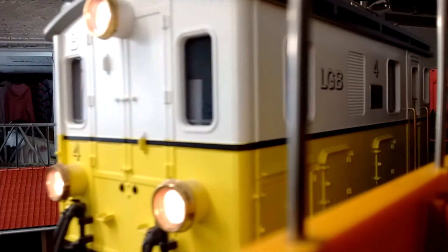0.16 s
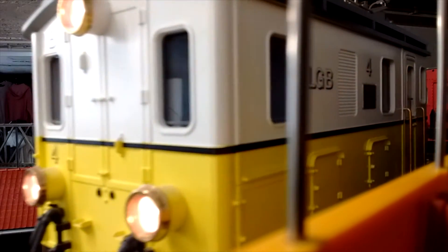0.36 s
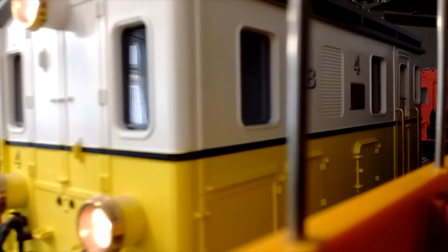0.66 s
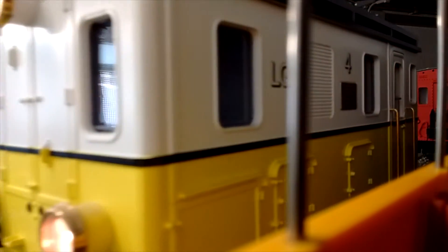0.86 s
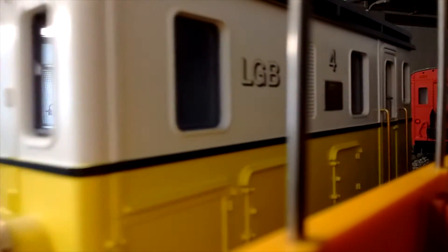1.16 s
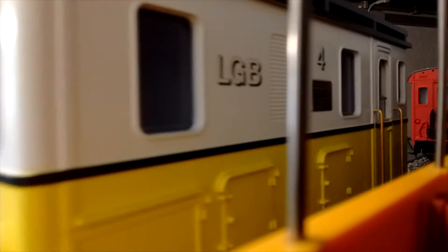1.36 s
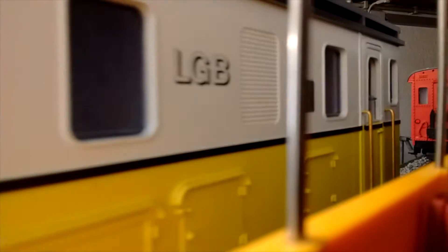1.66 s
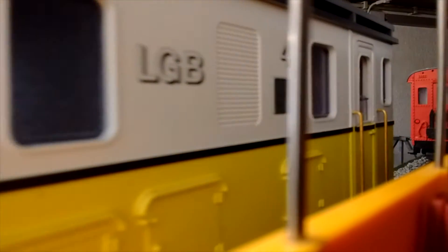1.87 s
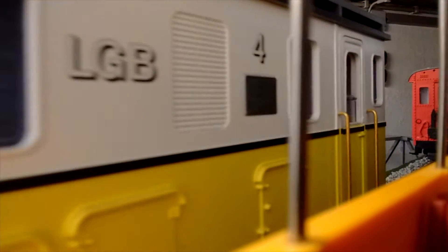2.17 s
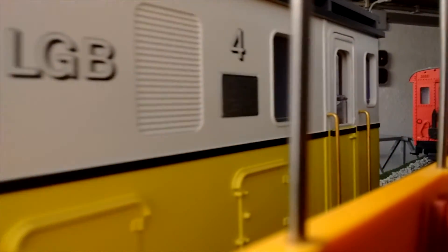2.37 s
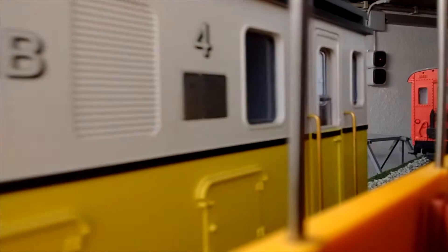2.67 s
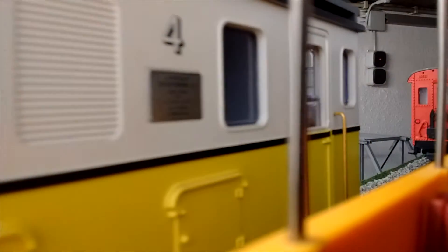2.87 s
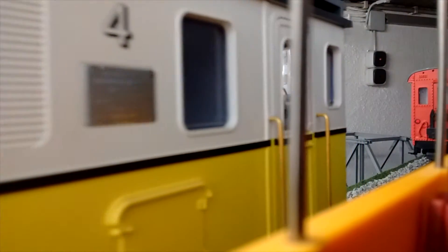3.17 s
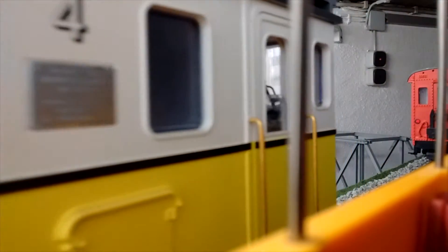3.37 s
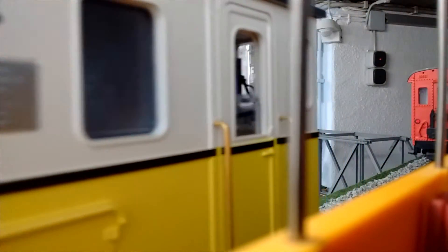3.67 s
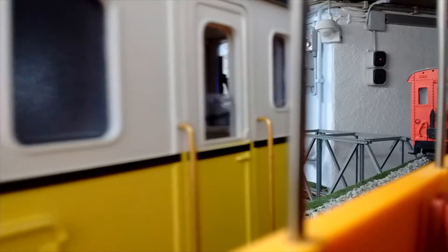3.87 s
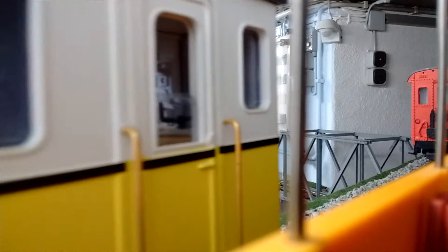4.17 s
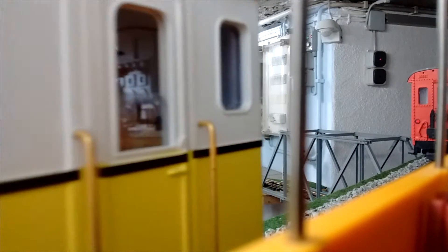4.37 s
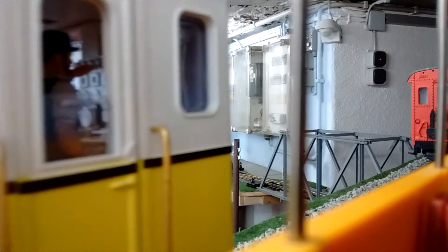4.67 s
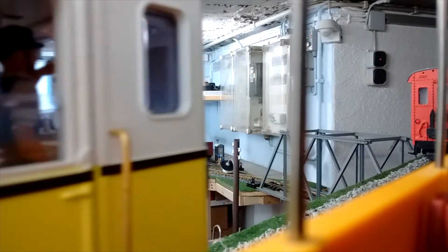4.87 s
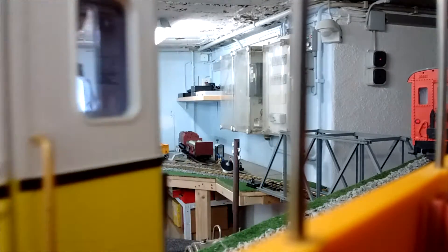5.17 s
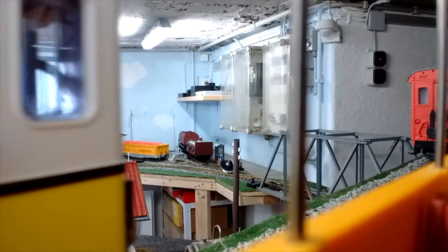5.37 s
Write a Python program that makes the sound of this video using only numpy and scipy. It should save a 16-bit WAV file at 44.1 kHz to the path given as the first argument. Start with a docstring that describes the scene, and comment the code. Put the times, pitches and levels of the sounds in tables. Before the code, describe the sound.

A small electric model locomotive creeps past two microphones right beside the track in a basement room, already running at the start and still running at the end, about 5.5 seconds. The motor gives a rough, steady buzz with a faint high whine; gears rasp and rattle, throbbing about ten times a second. The plastic shell drums hollowly over a low, wavering baseboard hum, while wheels hiss thinly on the rails. At 1.1 s a flange scuffs briefly; soft thuds and ticks come around 1.4 to 1.7 and 2.3 s. From about 2.7 s the higher buzz opens up, and around 3.3 s the engine is abreast, brightest and furthest left. More small ticks and bumps follow from 3.1 to 4.6 s. Just before 5 s a hard, close, clattering knock bursts out, with a short ring and room echo. The limiter then ducks the hissing, buzzing motor, which remains subdued to the end.

```python
"""Model locomotive creeping past

A model locomotive creeps past two microphones beside the track in a basement room.
Its pulse-fed motor buzzes as a stack of notes; shaped noise gives the gears' whirr, the drumming of the
plastic shell and the hiss and ticks of the wheels on the rails. The baseboard drones on a low note.
Near the end comes one hard, close knock, after which the limiter holds everything down."""
import sys
import numpy as np
from scipy import signal
from scipy.fft import rfft, irfft, next_fast_len
from scipy.io import wavfile
from scipy.ndimage import uniform_filter1d, map_coordinates

SR = 44100
rng = np.random.default_rng(int(sys.argv[2]) if len(sys.argv) > 2 else 0)


def transcribe(signal):
    """Save signal, clipped to [-1, 1], as a 16-bit WAV file at the path in sys.argv[1]."""
    frames = np.atleast_2d(signal).T
    limited = np.clip(frames, -1, 1)
    pcm = np.round(limited * 32767).astype(np.int16)
    wavfile.write(sys.argv[1], SR, pcm)


N = 243431
TIME = np.arange(N) / SR  # seconds
PULSE_HZ, PULSE_AT_S = 122.07, 0.0071  # rate of the motor's supply pulses, time of the first
GEAR_TURNS_PER_S = 10.38

# Resonances of the baseboard. Each row: pitch in Hz, width in Hz, relative level in dB.
BOARD_RESONANCES = [(50, 18, -5), (69, 14, -6), (89.5, 2.9, 6), (131.7, 65, 0.5), (166, 39, -5)]
# Colour of the gear noise. Each row: frequency in Hz, relative level in dB per Hz.
WHIRR_COLOUR = [(450, -27.5), (600, 3), (760, 2), (820, -2.5), (940, 7.5), (1080, -4.5), (1280, 0.5),
                (1550, -0.5), (1900, -11.5), (2180, 0), (2400, -18), (2800, -11.5), (3600, -76)]
# Left-right balance. Each row: frequency in Hz, left level minus right level in dB.
LEFT_RIGHT = [(60, -5.5), (200, 5), (380, 8.5), (560, 10), (950, -2), (1300, 0.5), (1800, 6), (2200, 2),
              (3000, 1.5), (6300, 4.5), (9500, 0), (13000, 4.5)]
# How far the left microphone leads. Each row: frequency in Hz, lead in radians.
LEFT_LEAD = [(400, 0), (2150, 0.5), (2450, 2.5), (3700, 4.5), (4300, 7.5), (5200, 4), (6400, 10),
             (8000, 11), (9300, 35.5), (11200, 21)]


def amp(db):
    """Turns decibels into gain."""
    return 10 ** (np.asarray(db) / 20)


def unit(x):
    """Scales a sound to rms 1; a pair is scaled by the mean of its channels."""
    return x / np.sqrt(np.mean(np.atleast_2d(x).mean(0) ** 2) + 1e-20)


def read(points, hz):
    """Reads a table's value at hz, on a log-frequency axis."""
    f, value = np.transpose(points)
    return np.interp(np.log(hz + 1), np.log(f), value)


def curves(rows):
    """Draws every column of a time table as a curve, sample by sample."""
    s, *columns = np.transpose(rows)
    return [np.interp(TIME, s, c) for c in columns]


def add(mix, s, sound):
    """Mixes a stereo sound in at time s."""
    part = mix[:, round(s * SR):][:, :sound.shape[1]]
    part += sound[:, :part.shape[1]]


def drift(hz):
    """Slow random wandering of rms 1, with little movement faster than about hz."""
    f = np.fft.rfftfreq(N, 1 / SR)
    lowpass = (f > 0) / (1 + (f / hz) ** 2) ** 2
    return unit(irfft(rfft(rng.standard_normal(N)) * lowpass, N))


def spectrum(points, hz):
    """Gain of a colour table, falling away below its first point."""
    return amp(read(points, hz)) * np.minimum(hz / points[0][0], 1) ** 2


def resonances(modes, hz):
    """Gain of a set of resonances with steep skirts, added as powers."""
    return np.sqrt(sum((amp(db) / (1 + ((hz - f) / width) ** 2)) ** 2 for f, width, db in modes))


def causal(gain):
    """The response with this gain that rings only after the blow (minimum phase)."""
    cepstrum = irfft(np.log(gain + 1e-6))
    half = cepstrum.shape[-1] // 2
    fold = np.r_[1, np.full(half - 1, 2), 1, np.zeros(half - 1)]
    return np.exp(rfft(cepstrum * fold))


def noise(colour, size=N, balance=LEFT_RIGHT):
    """Coloured noise as two microphones hear it: partly alike, with a lead and a balance in each band."""
    # Each row: frequency in Hz, left-right likeness, which is clipped to -1..1 below.
    likeness = [(60, 1.3), (160, -0.7), (340, 0.53), (640, 2.5), (1500, 3), (2300, .5), (3200, 0.96),
                (4600, 1.03), (5600, -1), (6400, 1.6), (9300, -0.45), (12000, 0)]
    length = next_fast_len(size)
    hz = np.fft.rfftfreq(length, 1 / SR)
    left, other = rfft(rng.standard_normal((2, length)))
    same = np.clip(read(likeness, hz), -1, 1)
    lean = amp(read(balance, hz) / 2)
    right = same * left * np.exp(-1j * read(LEFT_LEAD, hz)) + np.sqrt(1 - same ** 2) * other
    return unit(irfft(np.array([left * lean, right / lean]) * colour(hz), length)[:, :size])


def steady(x, size):
    """Evens out a noise's own swells over size samples, keeping its fast grain."""
    return unit(x / np.sqrt(uniform_filter1d((x ** 2).mean(0), size=size) + 1e-9))


def burst(colour, db, decay, balance=LEFT_RIGHT, size=8192, rise_share=0.21):
    """One contact: a brief chatter of even spectrum builds up, dies away and sets the body ringing."""
    t, hz = np.arange(size) / SR, np.fft.rfftfreq(size, 1 / SR)
    envelope = np.exp(-t / decay) * (1 - np.exp(-t / (rise_share * decay)))
    chatter = rfft(noise(np.ones_like, size=size) * envelope)
    uneven = np.sqrt(uniform_filter1d(abs(chatter) ** 2, size=40))
    lean = amp(np.outer([.5, -.5], read(balance, hz)))
    ring = irfft(chatter * causal(colour(hz) * lean / uneven))
    # A longer contact carries more energy at the same level in dB.
    return amp(db) * unit(ring) * np.sqrt(np.mean(np.exp(-2 * t / decay)))


def contacts(rows, body, balance=LEFT_RIGHT):
    """Blows on one body, each with its own level, decay and treble edge; a lower edge sounds duller."""
    out = np.zeros((2, N))
    for s, db, decay, edge_hz in rows:
        blow = burst(lambda hz: spectrum(body, hz) / (1 + (hz / edge_hz) ** 4), db, decay, balance=balance)
        add(out, s, blow)
    return out


def distance():
    """0 when the locomotive is abreast, towards 1 when it is far along the track."""
    abreast_s, pass_width_s = 3.3, 4.27
    u = ((TIME - abreast_s) / pass_width_s) ** 2
    return u / (1 + u)


def gear_turn(peak_s=0.0023, sharpness=0.28):
    """The slower gear binds once a turn: a short swell and a longer lull, rms 1."""
    swell = np.exp(sharpness * np.cos(2 * np.pi * GEAR_TURNS_PER_S * (TIME - peak_s)))
    return unit(swell - swell.mean())


def line(k, db, lean_db, waver_db=1.4, shiver_db=1.3, flutter=0.014, spread=0.72):
    """One multiple of the pulse rate, nearly in step with the others so that together they tap.

    It wavers slowly and shivers with the brushes; flutter and spread are in radians."""
    level = amp(db + waver_db * drift(2.2) + shiver_db * drift(59))
    phase = 2 * np.pi * round(k) * PULSE_HZ * (TIME - PULSE_AT_S)
    # The flutter grows with the multiple.
    phase = phase + spread * rng.standard_normal() + flutter * k * drift(4.4)
    left = amp(lean_db / 2) * np.cos(phase)
    right = amp(-lean_db / 2) * np.cos(phase - read(LEFT_LEAD, k * PULSE_HZ))
    return level * np.array([left, right])


def motor(turn_db=1.1, bare_db=3.5, shield_hz=1500):
    """Each supply pulse kicks the armature: a buzz that throbs with the gears, and a thin high whine."""
    # Steadier buzz notes. Each row: multiple of the pulse rate, base level in dB, left-right dB.
    buzz_notes = [(3, -54, -7), (4, -64, 16), (11, -69.5, 9), (12, -63, 15), (13, -59, 9), (15, -66.5, 8),
                  (16, -65, 7), (17, -70.5, 14)]
    # Strong notes that swell and fade as the shell slides past. Each row: multiple, left-right dB.
    swelling_notes = [(5, 12), (6, 9), (7, 18), (8, 8.5), (9, 3.5), (14, 8.5), (18, -5)]
    # Each row: time in seconds, then the base level in dB of each of those notes in turn.
    swell_levels = [(.15, -51, -57, -61, -52, -50.5, -79, -63),
                    (.65, -56, -55.5, -62, -61, -56.5, -65, -67),
                    (1.25, -51, -52.5, -60, -56.5, -52, -64, -62.5),
                    (1.8, -51, -53, -63, -55.5, -50, -53.5, -58),
                    (2.4, -49.5, -53.5, -66, -54, -56, -56.5, -57.5),
                    (3.0, -51, -54.5, -62, -53, -47, -59.5, -59),
                    (3.6, -54, -73, -60, -52.5, -49, -57, -63),
                    (4.2, -55.5, -65, -59, -50, -51.5, -59, -68),
                    (4.7, -55, -67, -68, -50.5, -49.5, -54, -64)]
    # Each row: time in seconds, base level of the whine in dB.
    whine_levels = [(0, -62), (.6, -64.5), (1.3, -67), (2.4, -78), (3.3, -65), (4.1, -73), (4.7, -64)]
    whine_multiple, whine_lean_db = 31, 5
    # The motor comes out from behind the shell, and its higher steady notes rise.
    pass_s, pass_width_s = 2.7, 0.27
    passed = np.tanh((TIME - pass_s) / pass_width_s)
    buzz = np.zeros((2, N))
    for k, db, lean_db in buzz_notes:
        buzz += line(k, db + bare_db * passed * (k * PULSE_HZ > shield_hz), lean_db)
    for (k, lean_db), db in zip(swelling_notes, curves(swell_levels)):
        buzz += line(k, db, lean_db, waver_db=1.08)
    whine_db = curves(whine_levels)[0]
    whine = line(whine_multiple, whine_db, whine_lean_db, waver_db=0, shiver_db=4.0, flutter=0.035)
    return buzz * amp(turn_db * gear_turn()) + whine


def sliding(x, broad_db=1.8, broad_hz=450, fine_db=6.0, fine_hz=70, change_s=0.81):
    """Reflections off shell and track shift with the movement, so peaks and dips in the colour come and go."""
    hz, t, z = signal.stft(x, SR, nperseg=1024)
    for depth_db, spacing_hz in ((broad_db, broad_hz), (fine_db, fine_hz)):
        place = np.meshgrid(hz / spacing_hz, t / change_s, indexing="ij")
        bumps = map_coordinates(rng.standard_normal(size=(512, 32)), place, order=3, mode="mirror")
        z = z * amp(depth_db * bumps)
    return signal.istft(z, SR, nperseg=1024)[1][:, :N]


def muffled(x, edge_hz=1200, far_db=-15.0):
    """The body shields the treble, more so the farther the locomotive is from abreast."""
    dull = signal.sosfiltfilt(signal.butter(2, edge_hz, fs=SR, output="sos"), x)
    return dull + amp(far_db * distance()) * (x - dull)


def rattle(level_db=-53.5, range_db=13.0, jitter_s=0.001804, decay=0.00032, count=24):
    """At each supply pulse one of the loose gear teeth clacks, mostly softly, now and then hard."""
    times = np.arange(PULSE_AT_S, N / SR, 1 / PULSE_HZ)
    teeth = [burst(lambda hz: spectrum(WHIRR_COLOUR, hz), 0, decay, size=2048) for _ in range(count)]
    out = np.zeros((2, N))
    for s, (tooth, force, early) in zip(times, rng.random((len(times), 3))):
        add(out, s - jitter_s * early, amp(range_db * force ** 2) * teeth[int(tooth * count)])
    return amp(level_db) * unit(out)


def gears(whirr_db=-52.0, hiss_db=2.5, whirr_pulse_db=1.5, hiss_pulse_db=0.43, kick_decay=0.24,
          turn_db=0.6, hiss_turn_db=0.65, grit_db=1.3, backlash_db=2.5):
    """Gears and wheels rasp and rattle at each supply pulse and swell with each turn of the slower gear."""
    # Colour of the wheel hiss. Each row: frequency in Hz, relative level in dB per Hz.
    hiss_colour = [(2000, 4.5), (3000, 1), (3500, 2), (4000, 2.5), (4600, -2.5), (5150, 0.5), (5650, -10.5),
                   (6250, -0.5), (7000, -4), (8000, -4), (8800, -6), (10500, -8.3), (12500, -11.5),
                   (15500, -13)]
    # Wheels hissing on the rails. Each row: time in seconds, level in dB before hiss_db is added.
    hiss_levels = [(0, -59), (.5, -57.5), (.9, -57), (1.4, -55.5), (3.4, -56.5), (4.9, -55.5), (5.2, -53),
                   (5.52, -54.5)]
    # kick_decay is a share of the time between pulses.
    kick = np.exp(-((TIME - PULSE_AT_S) * PULSE_HZ % 1) / kick_decay)
    kick = unit(kick - kick.mean())
    turn, grit = gear_turn(), grit_db * np.tanh(drift(300))
    backlash = backlash_db * np.tanh(drift(55))  # loose teeth catch unevenly, within their play
    teeth = sliding(noise(lambda hz: spectrum(WHIRR_COLOUR, hz)))
    teeth = unit(teeth * amp(whirr_pulse_db * kick + turn_db * turn + grit + backlash))
    hiss = sliding(noise(lambda hz: spectrum(hiss_colour, hz)), broad_db=0.5, fine_db=2.5)
    hiss = unit(hiss * amp(hiss_pulse_db * kick + hiss_turn_db * turn + grit))
    return muffled(amp(whirr_db) * teeth + rattle()) + amp(curves(hiss_levels)[0] + hiss_db) * hiss


def rolling(shell_db=-43.0, shell_far_db=-8.0, lump_db=0.86, uneven_db=2.0, throb_db=1.24, throb_s=0.029):
    """The wheels shake the baseboard, and uneven gear teeth drum on the shell, throbbing with each turn."""
    # Resonances of the plastic shell. Each row: pitch in Hz, width in Hz, relative level in dB.
    shell_resonances = [(288.6, 11.7, -4.5), (355.3, 37.5, 1.5), (383, 10.3, 2.5), (488, 42, -3.5),
                        (530, 110, -15.5)]
    # The baseboard shaking. Each row: time in seconds, level in dB.
    rumble_levels = [(4.0, -53), (4.9, -51)]
    rumble = steady(noise(lambda hz: resonances(BOARD_RESONANCES, hz)), size=5000)
    lumpy = noise(lambda hz: resonances(shell_resonances, hz)) * amp(lump_db * drift(63))
    drumming = steady(lumpy, size=3200)
    throb = throb_db * np.cos(2 * np.pi * GEAR_TURNS_PER_S * (TIME - throb_s)) + uneven_db * drift(36)
    drumming_db = shell_db + shell_far_db * distance() + throb
    return amp(curves(rumble_levels)[0]) * rumble + amp(drumming_db) * drumming


def knock(rise_s=0.0015, size=16384):
    """A quick run of contacts; the hardest leaves a few notes ringing."""
    # Each row: time in seconds, level in dB, decay in seconds, treble edge in Hz.
    blows = [(4.9605, -20, 0.01, 4800), (4.9668, 3.5, 0.0019, 2630), (4.9705, -12, 0.004, 1200),
             (4.9742, 3, 0.0044, 13500), (4.9762, 4, 0.0016, 2520), (4.979, -4, 0.0058, 13200),
             (4.9905, -12, 0.0014, 5000), (5.0035, -14, 0.0011, 3000), (5.0105, -8.5, 0.00077, 1400)]
    # What the knock rings with. Each row: frequency in Hz, relative level in dB per Hz.
    knock_colour = [(90, -14), (200, -18), (300, -15.5), (430, -2), (560, -1.5), (750, -12), (970, -4.5),
                    (1300, -15), (1620, -3), (1900, -4.5), (2300, -11), (2800, -15.5), (3600, -9.5),
                    (4250, -8.5), (4900, -16), (6400, -19.5), (7700, -13), (11000, -19), (15500, -16)]
    # Each row: frequency in Hz, left-right dB.
    knock_balance = [(60, -3), (380, 9), (700, 3), (1300, 1.5), (2400, 6.5), (4400, 2), (10000, 0.5),
                     (13000, 5)]
    # Notes that ring on. Each row: pitch in Hz, level in dB, seconds to fall by 60 dB.
    ringing_notes = [(134, -26, 0.2), (320, -25, 0.092), (464, -20, 0.06), (1008, -18, 0.15),
                     (1670, -28, 0.021), (4400, -23, .06)]
    out, t = contacts(blows, knock_colour, knock_balance), np.arange(size) / SR
    hardest_s = max(blows, key=lambda row: row[1])[0]
    for hz, db, t60 in ringing_notes:
        envelope = (1 - np.exp(-t / rise_s)) * np.exp(-np.log(1000) * t / t60)
        ring = amp(db) * envelope * np.sin(2 * np.pi * (hz * t + rng.random()))
        add(out, hardest_s, np.outer(amp(read(knock_balance, hz) * np.array([.5, -.5])), ring))
    return out


def wheel_ticks():
    """Wheels tick and knock on the rails, and a wheel flange catches on the rail: short bursts of noise."""
    # Ticks, then flange scuffs. Each row: time in seconds, level in dB, decay in seconds, treble edge in Hz.
    tick_rows = [(1.368, -35, 0.0086, 1150), (1.464, -39, 0.0099, 1590), (3.0925, -36.5, 0.0063, 14000),
                 (3.183, -38, 0.0089, 2300), (3.278, -41, 0.0038, 1990), (3.416, -36.5, 0.0047, 2000),
                 (3.7505, -39, 0.0054, 1900), (3.7899, -40.5, 0.0017, 15300), (3.9036, -38.5, 0.005, 5500),
                 (4.1336, -38.5, 0.006, 10500), (4.4982, -30, 0.0019, 8000), (4.619, -36.5, 0.01, 2000)]
    scuff_rows = [(1.1135, -32.5, 0.0032, 7000), (1.1205, -33, 0.0027, 4500), (1.1275, -33.5, 0.0041, 5500)]
    # Colours of tick and scuff. Each row: frequency in Hz, relative level in dB per Hz.
    tick_colour = [(200, 1.5), (900, 8), (2200, 2.5), (4300, 2), (6500, -2), (9000, 1), (15000, -7)]
    flange_colour = [(900, 3.5), (1600, -8), (2100, 4), (2900, 1), (3600, -5.5), (12000, -21)]
    return contacts(tick_rows, tick_colour) + contacts(scuff_rows, flange_colour)


def jolts(thud_hz=365, width_hz=110, board_share=0.18, decay=0.0073):
    """The chassis drops over uneven rail: a short thud in shell and baseboard."""
    # Each row: time in seconds, level in dB.
    jolt_rows = [(1.389, -34), (1.467, -31.5), (1.688, -31), (2.26, -33), (2.361, -32.5), (3.425, -36.5),
                 (3.499, -31.5), (3.785, -31.5), (4.13, -38.5), (4.623, -30.5)]

    def body(hz):
        """Gain of the shell's thud plus a share of the baseboard."""
        return resonances([(thud_hz, width_hz, 0)], hz) + board_share * resonances(BOARD_RESONANCES, hz)

    out = np.zeros((2, N))
    for s, db in jolt_rows:
        add(out, s, burst(body, db, decay))
    return out


def rails(ring_hz=5200, width_hz=300, level_db=-64.5, fade_db_per_s=3.5):
    """The rails sing thinly: a narrow band of noise that fades steadily from the start."""
    return amp(level_db - fade_db_per_s * TIME) * noise(lambda hz: resonances([(ring_hz, width_hz, 0)], hz))


def drone(level_db=-1.0, waver_db=-0.5, wander=0.97, drone_hz=64.5):
    """The baseboard's low note, now strong, now faint, alike in both microphones."""
    # Each row: time in seconds, level in dB before level_db is added.
    drone_levels = [(0, -52), (.15, -45.5), (.45, -52), (1.45, -52), (1.7, -71), (2.55, -61), (2.72, -44),
                    (3.0, -62), (3.4, -72), (3.9, -50), (4.5, -66), (4.75, -49), (5.05, -74)]
    level = amp(level_db + curves(drone_levels)[0] + waver_db * drift(5.5))
    return level * np.sin(2 * np.pi * drone_hz * TIME + wander * drift(9.0))


def room(x, build=0.0005):
    """A short diffuse echo made of noise, each band dying at its own speed."""
    # Each row: frequency in Hz, seconds to fall by 60 dB.
    fall_times = [(100, 0.56), (500, 0.2), (2000, 0.14), (9000, 0.18)]
    hz, t, z = signal.stft(rng.standard_normal((2, SR // 2)), SR, nperseg=256)
    decay = np.exp(-np.log(1000) * t / read(fall_times, hz)[:, None]) * (1 - np.exp(-t / build))
    tail = signal.istft(z * decay, SR, nperseg=256)[1]
    return signal.fftconvolve(x, tail / np.linalg.norm(tail[0]), axes=1)[:, :N]


def scene(left_db=1.0, far_left_db=-7.5, tick_room_db=-13, knock_room_db=-9):
    """The locomotive leans furthest left when abreast; its ticks and the knock echo in the room."""
    shift_db = left_db + far_left_db * distance()
    running = motor() + rolling() + gears() + rails() + jolts()
    running = running * amp([shift_db / 2, -shift_db / 2]) + drone()
    ticks, clack = wheel_ticks(), knock()
    return running + ticks + clack + room(amp(tick_room_db) * ticks + amp(knock_room_db) * clack)


def record(dry, ceiling_db=-11.0, recover_db_per_s=11, low_cut_hz=44, treble_edge_hz=15600):
    """Low cut; a limiter that ducks quickly on a loud peak and recovers slowly; soft clipping; treble cut."""
    dry = signal.sosfilt(signal.butter(4, low_cut_hz, "high", fs=SR, output="sos"), dry)
    power_db = 10 * np.log10(uniform_filter1d((dry ** 2).max(0), size=90) + 1e-12)
    # The highest peak so far, sinking at the recovery speed, sets the gain.
    fall = recover_db_per_s * TIME
    over_db = np.maximum(np.maximum.accumulate(power_db + fall) - fall - ceiling_db, 0)
    limited = np.tanh(dry * amp(-uniform_filter1d(over_db, size=40)))
    treble_cut = signal.firwin(511, treble_edge_hz, window=("kaiser", 9), fs=SR)
    return signal.oaconvolve(limited, treble_cut[None], "same", axes=1)


dry = scene()
out = record(dry)
transcribe(out)
```